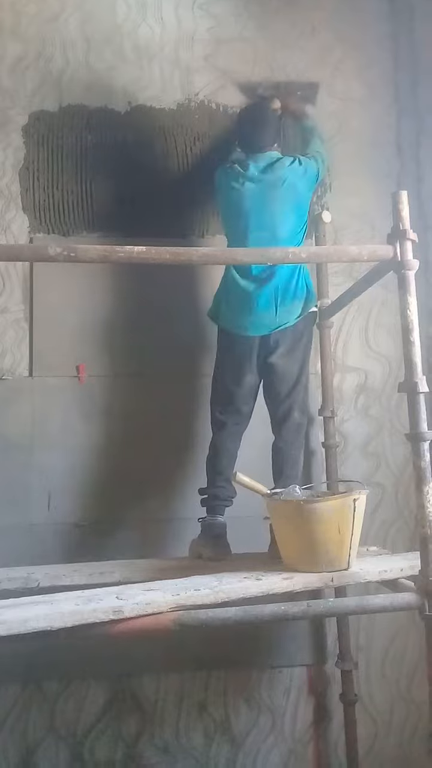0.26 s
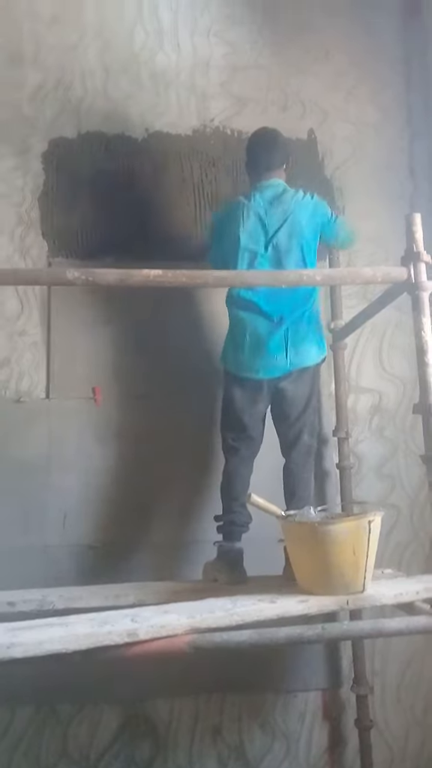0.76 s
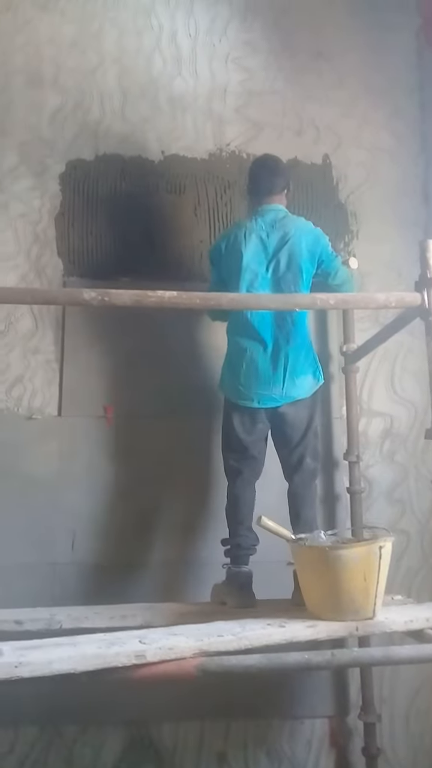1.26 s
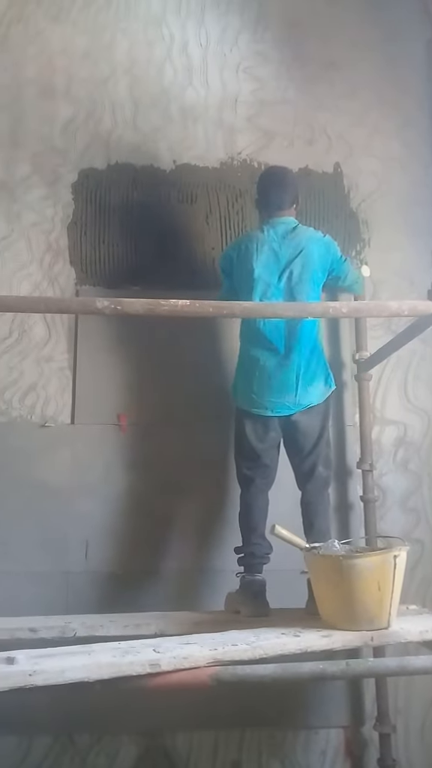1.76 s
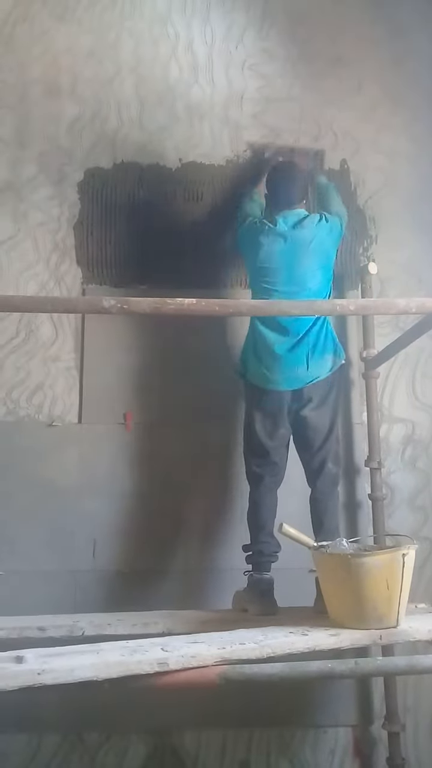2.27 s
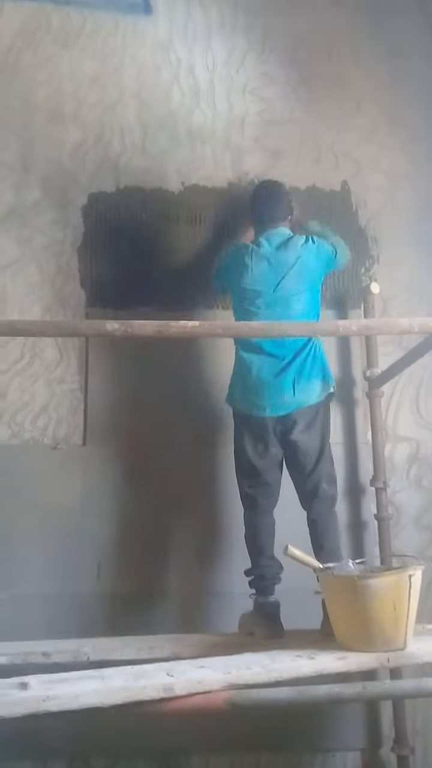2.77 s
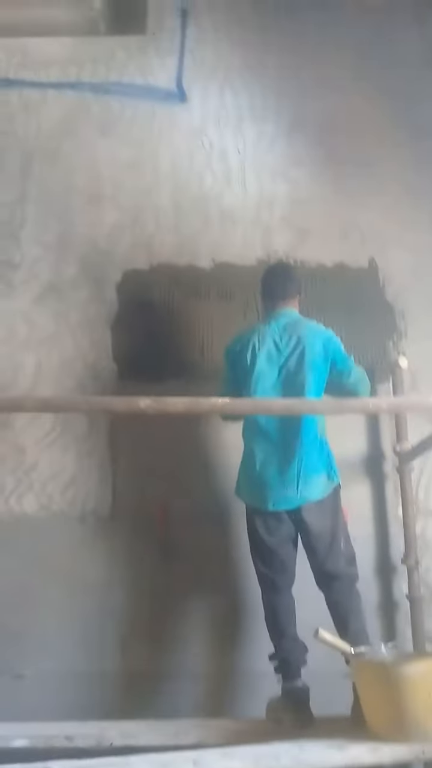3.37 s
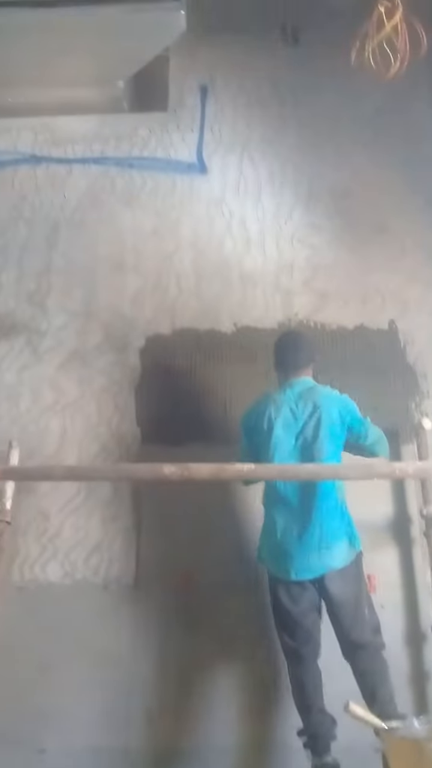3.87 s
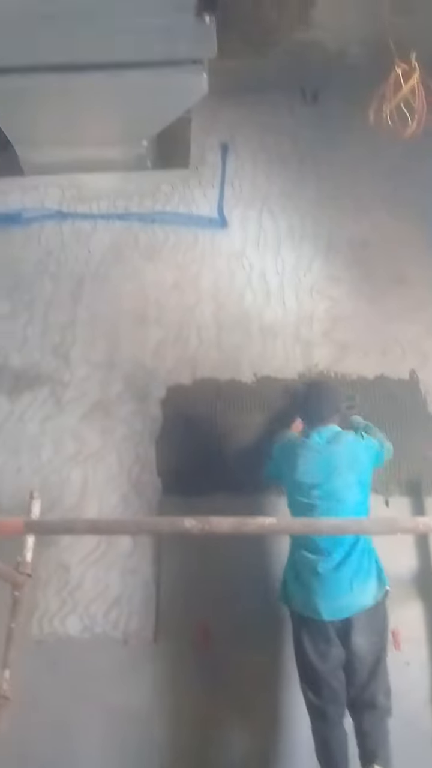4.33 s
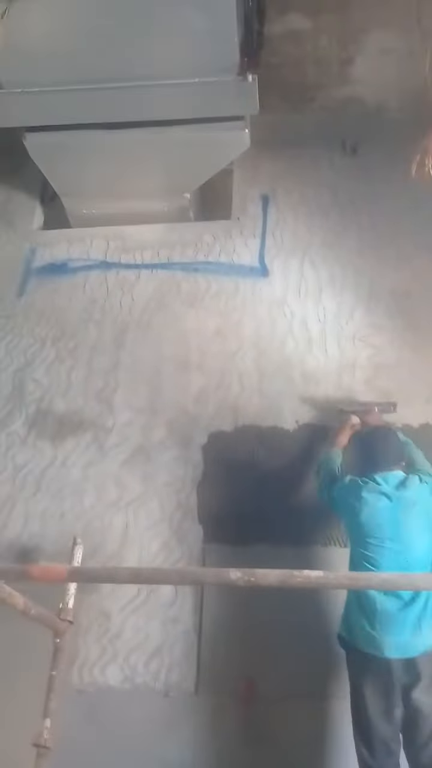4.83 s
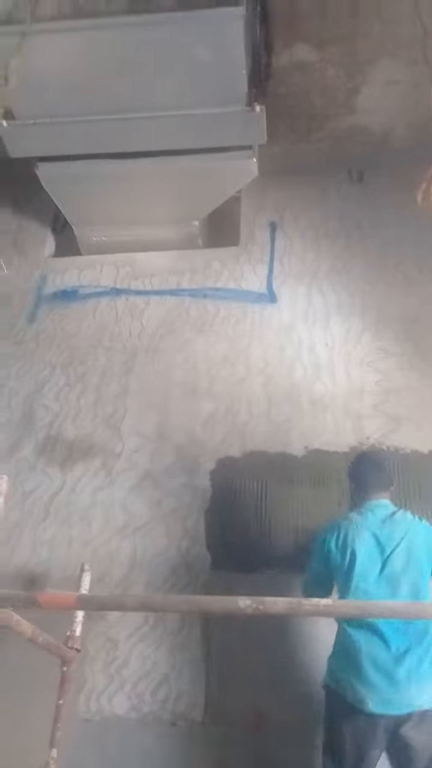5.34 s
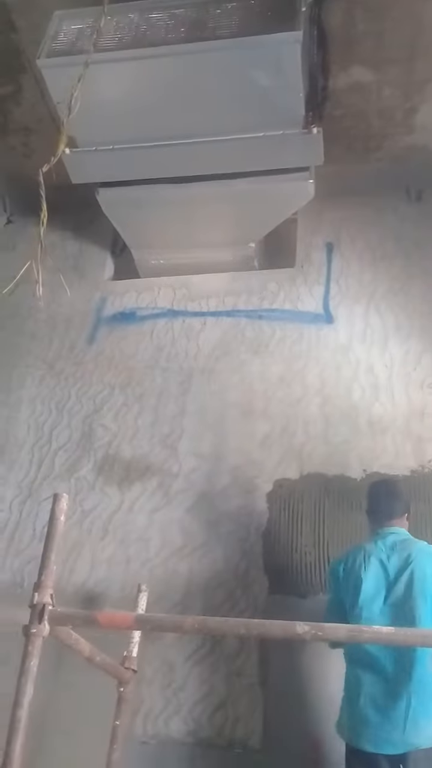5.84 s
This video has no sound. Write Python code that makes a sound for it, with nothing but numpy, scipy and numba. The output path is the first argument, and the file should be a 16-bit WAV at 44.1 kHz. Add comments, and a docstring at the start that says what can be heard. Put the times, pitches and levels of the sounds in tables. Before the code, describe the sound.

A bare, reverberant concrete hall, heard in mono by a phone a few metres from the wall. A steel trowel scrape is already under way at 0 s, gritty and ringing around 1 kHz, and lifts off by 0.3 s. Its echo decays for about a second, treble first, over distant building-site rumble and a faint wavering hum. At about 1.46 s the blade taps the wall in a tight clatter, with another small knock at 1.65; a stroke swells from then to 2.4 s, loudest near 1.95. The tail dies away, with a faint brush at 3.0. Soft, dull knocks come around 3.7, then a rough scrape from 3.9 to 4.55, with a brief dip near 4.35, and a short trailing scrape to 4.7. Reverberation fades; faint swishes and tiny ticks follow at 5.2-5.6. From 5.8 only a very faint scrape begins, and low rumble rises at the end.

```python
"""A notched steel trowel is dragged in strokes down a rough wall, a few metres from a phone in a bare concrete
hall. Sand grains catch under the teeth and ring the blade: dense clicks through filters, over noise for the
mortar. Changing patterns of decaying noise make the hall, which carries each stroke on for a second, treble
dying first. The blade taps the wall before a stroke and rings as it lands; small things tick (struck
resonances) or brush (short band noise). The building site rumbles far off: a bed of coloured noise with a
wavering hum, a swelling rumble and far work."""
import sys
import numpy as np
from scipy import signal
from scipy.fft import rfft, irfft
from scipy.io import wavfile
from scipy.ndimage import uniform_filter1d
from numba import njit

SR = 44100
rng = np.random.default_rng(int(sys.argv[2]) if len(sys.argv) > 2 else 0)


def to_wav(s):
    """Save 16-bit WAV."""
    ch = np.atleast_2d(s).T  # columns
    pcm = np.round(np.clip(ch, -1, 1) * 32767)  # PCM
    wavfile.write(sys.argv[1], SR, pcm.astype(np.int16))


N = 269010
LEAD = SR  # samples of run-up: the first stroke is under way before time zero

GRAINS_PER_S, GRAIN_SPREAD_DB = 12000, 1.5
FULL_DB = -22  # blade level of a firm push
PUSH_TRIM_DB = -5.5  # lowers each push before the hall adds its share
MORTAR_PER_DB, GRIT_PER_DB = 0.4758, 0.0617  # gain on the blade, in dB for each dB of lighter pressure
LIFT_S, LIFT_DB = 0.032, -8  # grit and dust dip as the teeth leave the wall
LAND_S, LAND_DB = 0.056, -5  # and as they land
HUMP_WIDTH_HZ, HUMP_WANDER = 379, .04  # the wander is a share of the hump's frequency
HUMP_FLICKER_DB, GRIT_FLICKER_DB = 1.5, 1.2
THRUM_DB = -31  # the wall's low thrum, relative to the blade
TAP_HALL_DB = 3.5  # how strongly taps are sent into the hall
BRUSH_TAPER = .6  # share of a swish spent swelling and fading
MOVE_S = .03  # the echo pattern changes this often as trowel and phone move
HALL_DB, HALL_GAP_S, HALL_RISE_S = 4, 0.00075, 0.0082
BEYOND_DB, BEYOND_LONGER = -16.5, 1.894  # the open spaces next door return a weaker, slower tail
SITE_DB, WORK_DB = -59, -68.5
HUM_HZ, HUM_WIDTH_HZ = 84.9, 13
HISS_DB, TOP_HZ = -78, 15700


def trowel():
    """Grains ring the blade and its hump, hiss in the treble, and the mortar drags below."""
    # How hard the teeth press, one list a push: (time [s], blade level before the trim [dB])
    strokes = [
        [(-0.2, -37), (0.0, -23.5), (0.054, -26.5), (0.13, -25.5), (0.186, -21), (0.244, -32), (0.3, -40)],
        [(1.625, -45), (1.667, -34.5), (1.76, -24.5), (1.83, -21.5), (1.955, -19), (2.03, -20.5), (2.101, -24),
         (2.219, -25), (2.351, -21.5), (2.375, -30.5), (2.44, -35)],
        [(3.82, -50), (3.86, -42), (3.914, -44.5), (3.98, -30), (4.05, -22), (4.17, -22), (4.226, -24),
         (4.348, -31.5), (4.386, -21.5), (4.5, -23.5), (4.55, -30.5)],
        [(4.55, -38), (4.57, -25), (4.656, -29.5), (4.722, -40.5), (4.73, -45)],
        [(5.72, -61), (5.77, -62), (5.804, -53.5), (5.846, -52), (5.9, -51), (5.972, -48), (6.0, -43),
         (6.05, -49.5), (6.1, -55)],
    ]
    # Tone of each push: (grit treble re blade [dB], mortar drag re blade [dB], blade hump [Hz],
    # hump re blade at start [dB], hump re blade at end [dB], fine dust re blade [dB])
    stroke_colour = [(-4.5, -18, 900, -7, 5, -22), (-5.5, -14, 950, 1.5, 1.5, -20),
                     (-6.5, -15.5, 955, -1, -1.5, -21), (-4.5, -15, 960, 0.5, 2.5, -19),
                     (-6.5, -12, 900, -1.5, -1.5, -26)]
    # Ringing of the steel blade: (frequency [Hz], level [dB per Hz])
    blade_spectrum = [(590, -19), (1000, 3), (1100, 4.5), (1290, 4.5), (2150, 2), (2790, -2.5), (3200, -13),
                      (5440, -22.5), (7000, -46), (9100, -69.5), (15400, -120)]
    # Treble of the caught sand: (frequency [Hz], level [dB per Hz])
    grit_spectrum = [(3000, -3), (3400, 0), (4500, -1.5), (6300, -3.5), (8000, -8.5), (10000, -10.5),
                     (13000, -19)]
    # Fine dust at the very top: (frequency [Hz], level [dB per Hz])
    dust_spectrum = [(9500, -7.5), (11000, -0.5), (13000, -3.5), (15700, -8)]
    # Low drag of the mortar: (frequency [Hz], level [dB per Hz])
    mortar_spectrum = [(90, -18.5), (180, -5.5), (300, -2), (500, 2), (800, -14)]

    size = N + LEAD
    t = (np.arange(size) - LEAD) / SR
    touch, lift_db = contact(t, strokes)
    blade_db = np.interp(t, *np.concatenate(strokes).T)
    light_db = FULL_DB - blade_db

    # each push has its own tone
    ends = [rows[-1][0] for rows in strokes]
    push = np.minimum(np.searchsorted(ends, t), len(strokes) - 1)
    grit_db, mortar_db, hump_hz, start_db, end_db, dust_db = np.array(stroke_colour)[push].T
    start, end = np.array([(rows[0][0], rows[-1][0]) for rows in strokes])[push].T
    progress = np.clip((t - start) / (end - start), 0, 1)
    hump_db = start_db + (end_db - start_db) * progress

    grit_db = grit_db + GRIT_PER_DB * light_db + lift_db + GRIT_FLICKER_DB * walk(15, size)
    hump_hz = hump_hz * (1 + HUMP_WANDER * walk(20, size))
    hump_db = hump_db + HUMP_FLICKER_DB * walk(20, size)

    sand = grains(size) * undb(1.0 * walk(60, size))  # the ridges of the wall make the drag uneven
    hump = svf(svf(sand, hump_hz, 1. * HUMP_WIDTH_HZ), hump_hz, 2. * HUMP_WIDTH_HZ)
    blade = level(colour(sand, blade_spectrum), 0) + level(hump, hump_db)
    grit = level(colour(sand, grit_spectrum), grit_db)
    dust = level(colour(grains(size), dust_spectrum), dust_db + lift_db)
    drag = colour(rng.standard_normal(size), mortar_spectrum)
    mortar = level(drag, mortar_db + MORTAR_PER_DB * light_db)
    thrum = level(band(rng.standard_normal(size), 170, 180), THRUM_DB)
    return touch * undb(blade_db + PUSH_TRIM_DB) * (blade + grit + dust + mortar + thrum)


def contact(t, strokes):
    """When the blade touches the wall, and how far its treble dips (dB) around each landing and lift."""
    touch, lift_db = np.zeros(len(t)), np.zeros(len(t))
    for rows in strokes:
        start, end = rows[0][0], rows[-1][0]
        touch[(t <= end) & ((t > start) | (start <= 0))] = 1
        lift_db += LIFT_DB * np.clip(1 - np.abs(t - end) / LIFT_S, 0, 1)
        if start > 0:
            lift_db += LAND_DB * np.clip(1 - np.abs(t - start) / LAND_S, 0, 1)
    return uniform_filter1d(touch, 440), lift_db  # the blade lands and lifts within 10 ms


def grains(size):
    """Sand grains that catch and let go: dense clicks of either sign, a few larger."""
    hit = rng.random(size) < GRAINS_PER_S / SR
    return hit * rng.choice([-1., 1.], size) * undb(GRAIN_SPREAD_DB * rng.exponential(size=size))


def tap(db, tilt_db):
    """The blade touches the wall and its modes ring together, tilted in dB per octave about the third."""
    # Modes of the tapped blade: (centre [Hz], width [Hz], level [dB])
    modes = [(400, 430, -16.5), (930, 500, -7), (1557, 720, -1.5), (2180, 1100, -8), (3600, 1700, -18),
             (5300, 2200, -13.5), (10900, 4500, -23)]
    ring = 0
    for k, (hz, width, mode_db) in enumerate(modes):
        tilted_db = db + mode_db + tilt_db * np.log2(hz / modes[2][0])
        ring = ring + (-1) ** k * crack(hz, width, tilted_db)
    return ring


def ticks():
    """Taps of the blade and small knocks, as heard directly and as sent into the hall."""
    # Knocks and ticks, the first a ring as the blade lands at the start of a stroke, the rest small knocks:
    # (time [s], peak level [dB], centre [Hz], width [Hz], hall share [dB])
    knock_rows = [(1.648, -28.5, 1000, 600, 3), (3.711, -38.5, 434, 300, 0.5), (3.731, -38, 490, 400, -5),
                  (3.753, -41, 550, 400, -1), (5.160, -60, 7500, 2500, -8), (5.383, -43, 12100, 12000, 7)]
    # Blade touches the wall: (time [s], level before the mode levels [dB], tilt [dB per octave])
    tap_rows = [(1.462, -31, -2), (1.466, -28, 0.5), (1.478, -37.5, 0.5), (1.491, -38.5, 6)]
    near, far = np.zeros(N + LEAD), np.zeros(N + LEAD)
    blows = [(s, crack(hz, width, db), hall_db) for s, db, hz, width, hall_db in knock_rows]
    blows += [(s, tap(db, tilt_db), TAP_HALL_DB) for s, db, tilt_db in tap_rows]
    for s, blow, hall_db in blows:
        i = LEAD + int(s * SR)
        near[i:i + len(blow)] += blow
        far[i:i + len(blow)] += blow * undb(hall_db)
    return near, far


def crack(hz, width, db):
    """One blow into a damped resonance, scaled to a peak level."""
    impulse = signal.unit_impulse(4000) + 1e-18  # the tiny offset keeps the filters off slow, minute numbers
    ring = band(band(impulse, hz, width), hz, 2 * width)
    return ring * undb(db) / np.abs(ring).max()


def brushes():
    """Faint short swishes, mostly in the pauses: band noise that swells and fades."""
    # Swishes: (start [s], length [s], level before the taper [dB], centre [Hz], width [Hz])
    swishes = [(0.798, 0.2, -79.5, 4440, 3000), (1.257, 0.32, -74.5, 2110, 1190),
               (1.474, 0.088, -61.5, 5200, 3500), (1.478, 0.069, -67.5, 11540, 3990),
               (3.002, 0.29, -76, 2140, 723), (3.677, 0.18, -65, 1880, 900), (3.674, 0.25, -74, 5000, 1500),
               (3.696, 0.086, -56, 480, 402), (5.262, 0.17, -69, 5400, 2000),
               (5.248, 0.25, -64.5, 2040, 1180), (5.362, 0.11, -73.5, 3970, 121),
               (5.397, 0.53, -77.5, 4900, 1500), (5.62, .23, -68, 2050, 250)]
    out = np.zeros(N + LEAD)
    for s, length, db, hz, width in swishes:
        noise = rng.standard_normal(SR // 2)[:int(length * SR)]
        swish = level(band(noise, hz, width), db) * signal.windows.tukey(len(noise), BRUSH_TAPER)
        i = LEAD + int(s * SR)
        out[i:i + len(noise)] += swish
    return out


def hall(x, count=5):
    """The sound is handed on from one echo pattern to the next, at constant power."""
    turn, out = np.arange(len(x)) / (SR * MOVE_S), 0
    for k, pattern in enumerate(echoes(count)):
        away = np.abs((turn - k + count / 2) % count - count / 2)  # turns from this pattern's moment
        sent = x * np.cos(np.pi / 2 * np.minimum(away, 1))
        out = out + signal.fftconvolve(sent, pattern)[:len(x)]
    return out


def echoes(count):
    """Patterns of dense echoes from bare walls: they swell, then each half-octave dies at its own rate."""
    t = np.arange(3 * SR // 2) / SR
    swell = np.clip((t - HALL_GAP_S) / HALL_RISE_S, 0, 1)
    spectrum, hz = rfft(rng.standard_normal((count, len(t)))), np.fft.rfftfreq(len(t), 1 / SR)
    out = 0
    for step in range(18):
        centre = 50 * 2 ** (step / 2)
        share = np.clip(1 - 2 * np.abs(np.log2((hz + 1) / centre)), 0, 1)
        decay = fade(t, centre, 0.88) + undb(BEYOND_DB) * fade(t, centre, BEYOND_LONGER)
        out = out + irfft(spectrum * share) * decay
    return out * swell * undb(HALL_DB) / np.sqrt(SR / np.log(1e6))  # unit energy for a decay of one second


def fade(t, hz, longer):
    """Decay of the hall at one frequency: down 60 dB in its reverberation time, times a stretch."""
    # Reverberation of the bare hall, before the stretch: (frequency [Hz], time to fall 60 dB [s])
    hall_t60 = [(125, 1.52), (500, 1.125), (1000, 1.035), (2000, 0.89), (4000, 0.7), (8000, 0.48),
                (15000, 0.2)]
    return 1000 ** (-t / (longer * along(hz, hall_t60)))


def site():
    """Far noise of the building site: a coloured bed, a wavering hum, a rumble that swells and far work."""
    # Colour of the distant bed: (frequency [Hz], level [dB per Hz])
    site_spectrum = [(25, -16.5), (40, 10), (60, -5), (130, -7.5), (250, -27), (350, -11.5), (600, -3.5),
                     (1200, -25), (2500, -27.5), (3500, -40), (6000, -50), (10000, -63.5)]
    # Swells of the low end: (time [s], hum level [dB], rumble level [dB])
    swells = [(0.0, -66, -51), (0.6, -56, -56.5), (1.6, -54.5, -52.5), (1.9, -65, -57), (2.6, -63, -50.5),
              (3.0, -59, -58), (3.9, -58.5, -54), (4.8, -63, -54.5), (5.7, -59.5, -55.5),
              (5.92, -63.5, -60.5), (6.1, -48, -40.5)]
    s, *columns = np.transpose(swells)
    hum_db, rumble_db = (np.interp(np.arange(N) / SR, s, c) for c in columns)
    bed = level(colour(rng.standard_normal(N), site_spectrum), SITE_DB)
    hum = level(band(rng.standard_normal(N), HUM_HZ, HUM_WIDTH_HZ), hum_db)
    rumble = level(band(rng.standard_normal(N), 140, 180), rumble_db)
    work = level(band(rng.standard_normal(N), 850, 390), WORK_DB)
    return bed + hum + rumble + work


def undb(db):
    """dB to gain."""
    return 10 ** (np.asarray(db) / 20)


def level(x, db):
    """Scale to unit rms, then apply a level that may move."""
    return x * undb(db) / np.sqrt(np.mean(x ** 2))


def along(hz, table):
    """Read a (Hz, value) table on a log-frequency axis."""
    f, v = np.transpose(table)
    return np.interp(np.log(np.maximum(hz, 1)), np.log(f), v)


def colour(x, table):
    """Causal filter with the gain of a spectrum table, from the folded cepstrum; steep outside the table."""
    hz = np.arange(8193) * SR / 16384
    (low_hz, low_db), (high_hz, high_db) = table[0], table[-1]
    table = [(1, -90), (low_hz / 2, low_db - 30), *table, (high_hz * 2, high_db - 30)]
    cep = irfft(np.log(undb(along(hz, table))))
    cep[1:8192] *= 2  # folding gives minimum phase
    cep[8193:] = 0
    return signal.fftconvolve(x, irfft(np.exp(rfft(cep))))[:len(x)]


@njit
def svf(x, hz, width):
    """State-variable band-pass whose centre may move, gain 1 at the centre."""
    y, b, l = np.empty(len(x)), 0., 0.  # output, band and low-pass states
    for i in range(len(x)):
        g, k = np.tan(np.pi * hz[i] / SR), width / hz[i]
        v = (b + g * (x[i] - l)) / (1 + g * (g + k))
        b, l, y[i] = 2 * v - b, l + 2 * g * v, k * v
    return y


def band(x, hz, width):
    """A resonance applied twice, the second time twice as wide: steep sides."""
    centre = np.full(len(x), min(hz, .45 * SR))
    return svf(svf(x, centre, 1. * width), centre, 2. * width)


def walk(rate, size):
    """Random levels held 1 / rate s and slewed; spread a little under 1."""
    k = int(SR / rate)
    return uniform_filter1d(np.repeat(rng.standard_normal(size // k + 1), k), k)[:size]


def scene():
    """Trowel, ticks and brushes, direct and through the hall, over the site."""
    drag = trowel() + brushes()
    near, far = ticks()
    mono = (drag + near + hall(drag + far))[LEAD:] + site()
    return np.array([mono, mono])


def record(dry):
    """One microphone with two dips in its response and its own hiss feeds both channels; the top is cut steeply."""
    # Response of the microphone: (frequency [Hz], gain [dB])
    microphone = [(20, -3.5), (2700, 0), (3400, -2.5), (4300, -1), (6300, -1), (8700, -2.5), (10500, 0),
                  (15700, 1.5)]
    mono = colour(dry[0], microphone) + level(rng.standard_normal(N), HISS_DB)
    top_cut = signal.ellip(14, .3, 80, TOP_HZ, fs=SR, output="sos")
    return signal.sosfilt(top_cut, np.array([mono, mono]))


dry = scene()
out = record(dry)
to_wav(out)
```